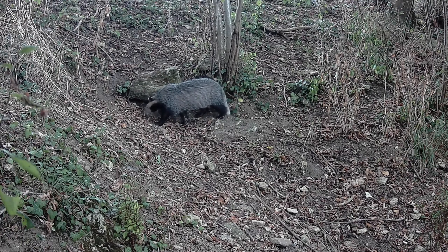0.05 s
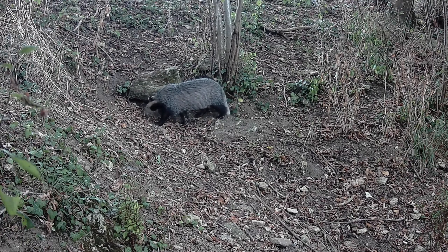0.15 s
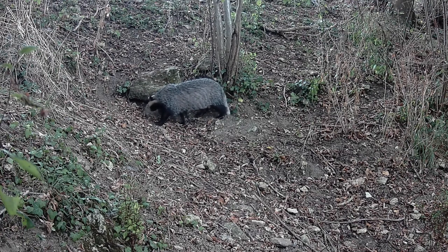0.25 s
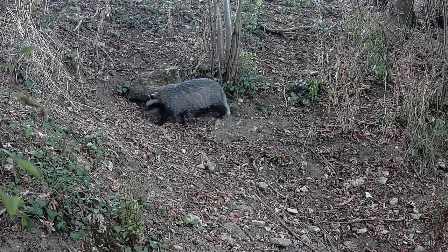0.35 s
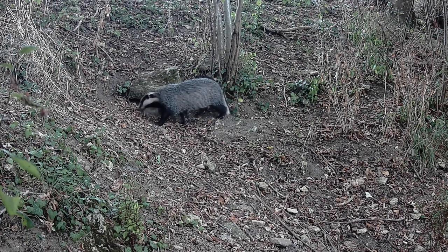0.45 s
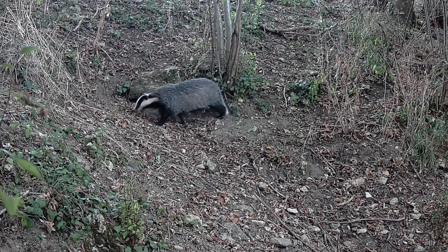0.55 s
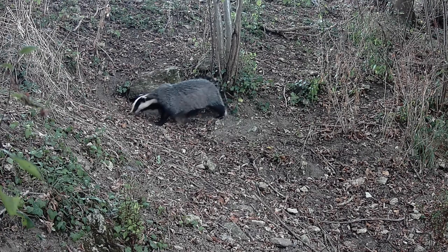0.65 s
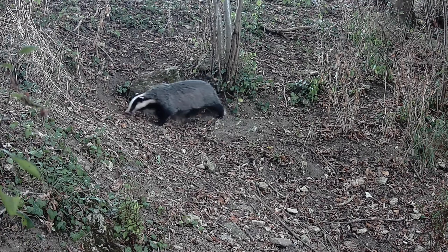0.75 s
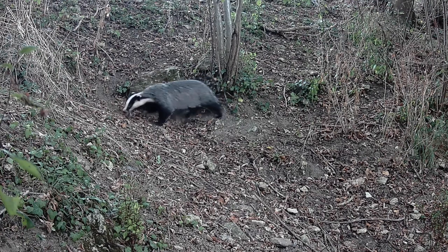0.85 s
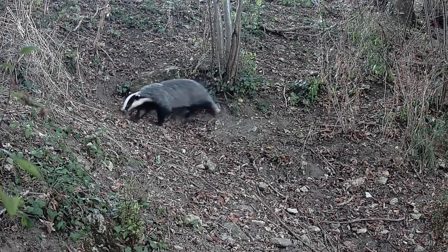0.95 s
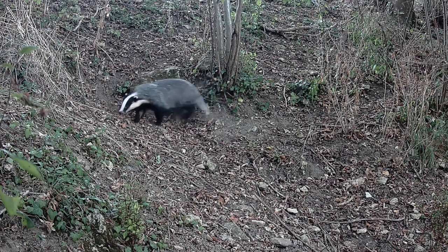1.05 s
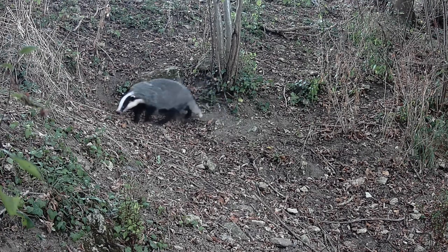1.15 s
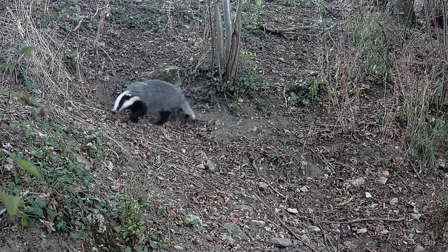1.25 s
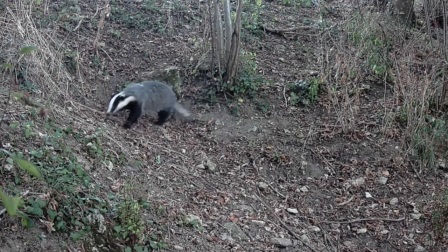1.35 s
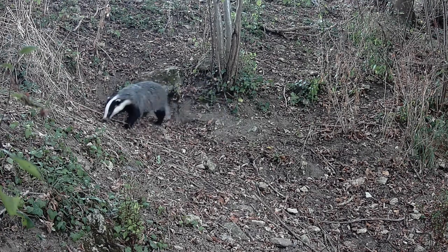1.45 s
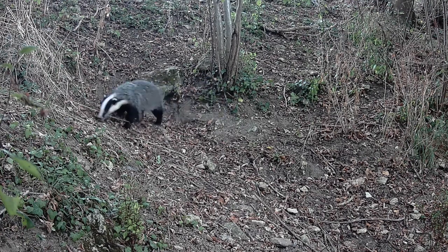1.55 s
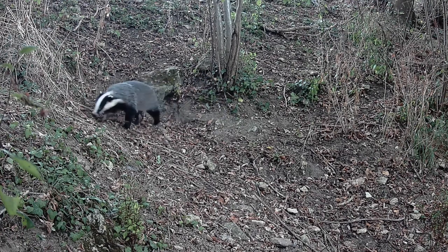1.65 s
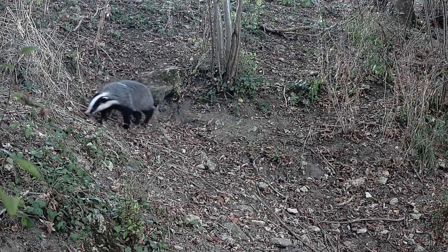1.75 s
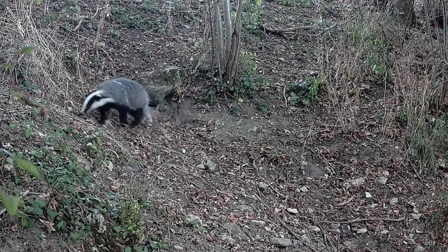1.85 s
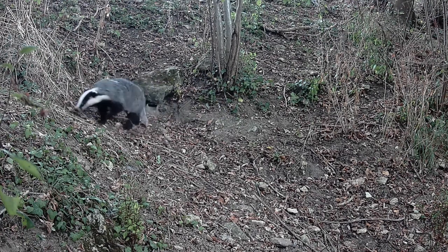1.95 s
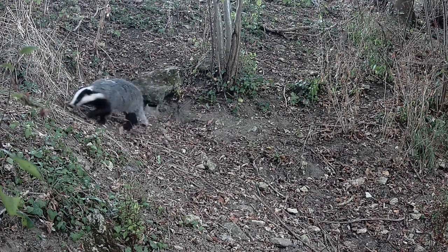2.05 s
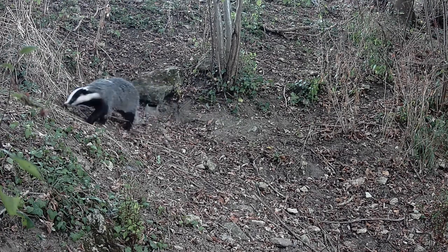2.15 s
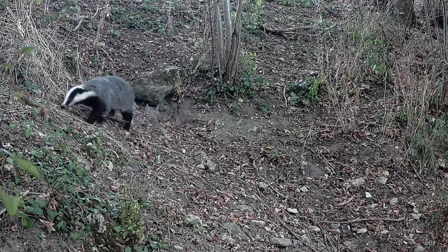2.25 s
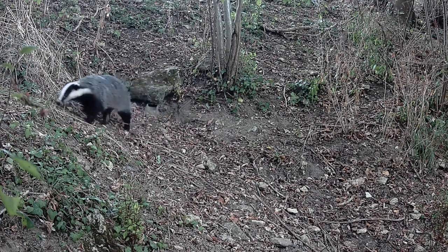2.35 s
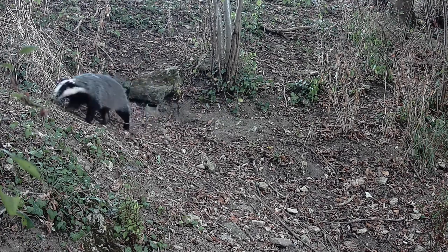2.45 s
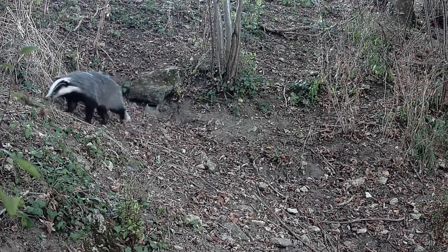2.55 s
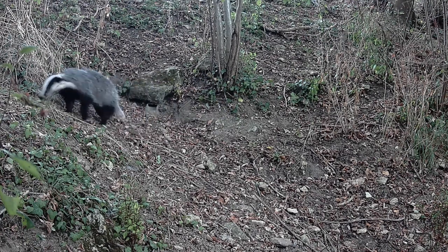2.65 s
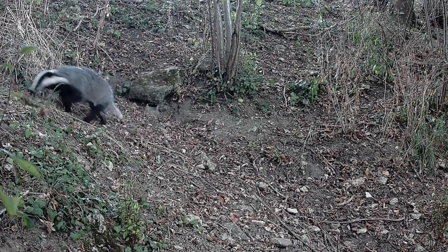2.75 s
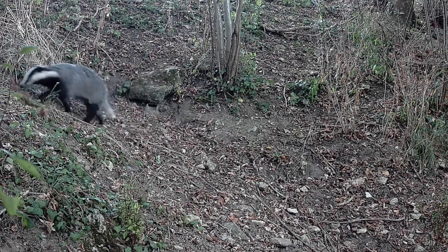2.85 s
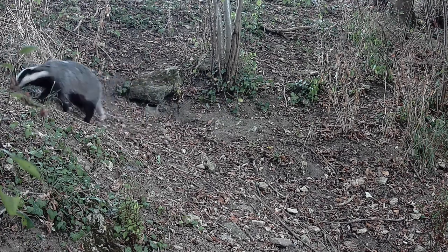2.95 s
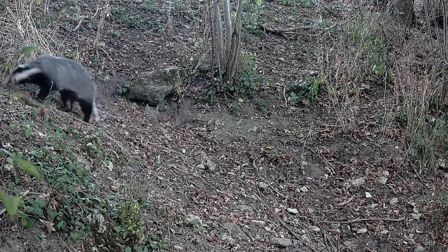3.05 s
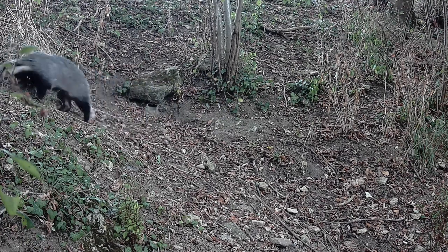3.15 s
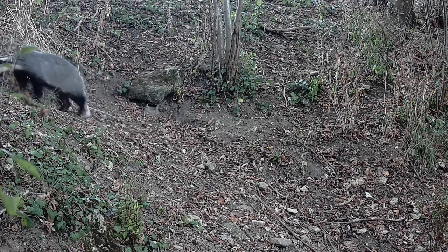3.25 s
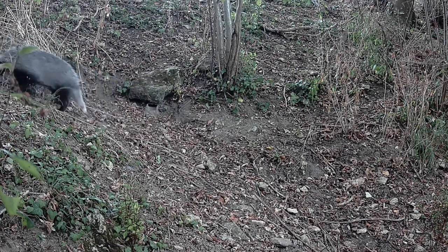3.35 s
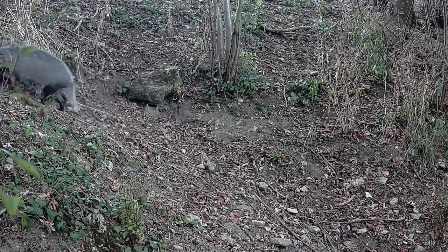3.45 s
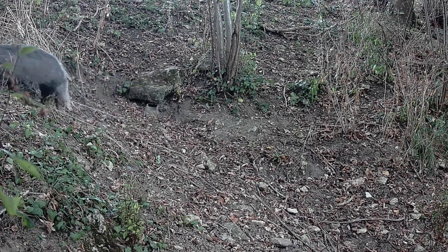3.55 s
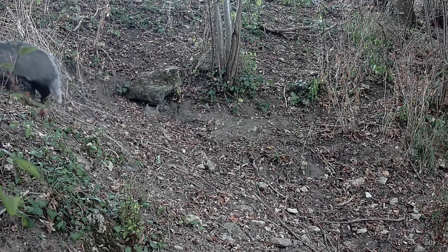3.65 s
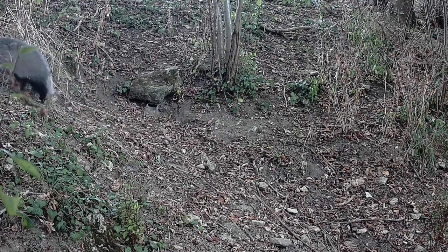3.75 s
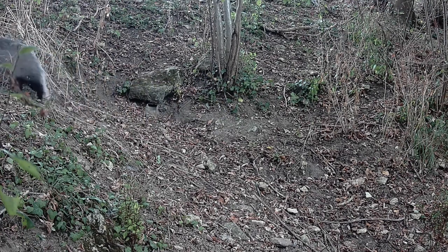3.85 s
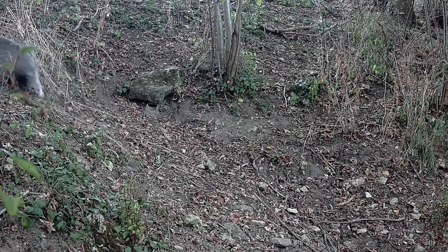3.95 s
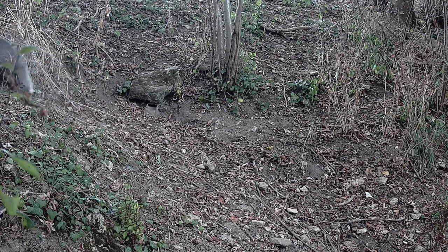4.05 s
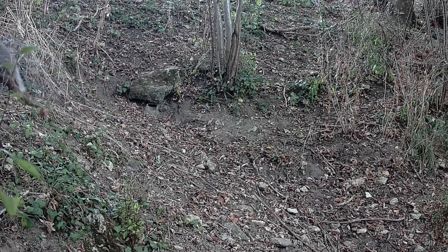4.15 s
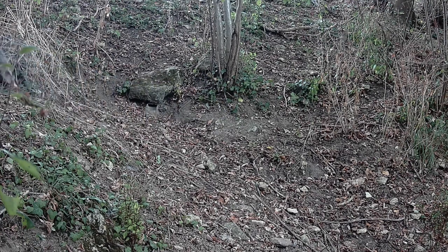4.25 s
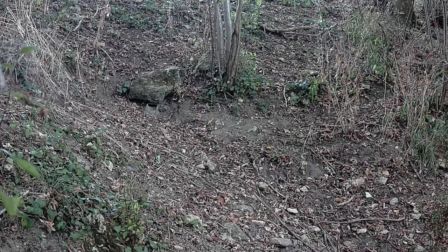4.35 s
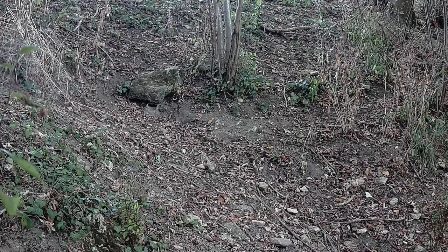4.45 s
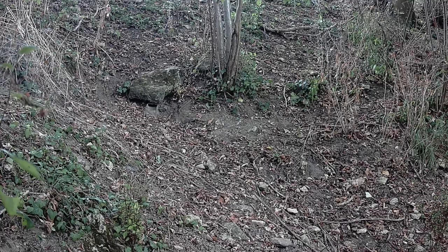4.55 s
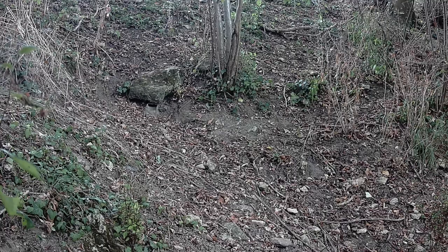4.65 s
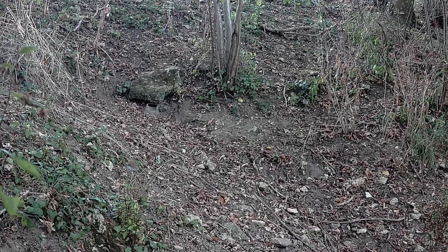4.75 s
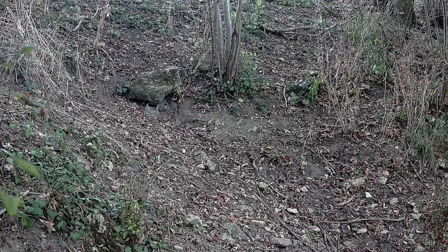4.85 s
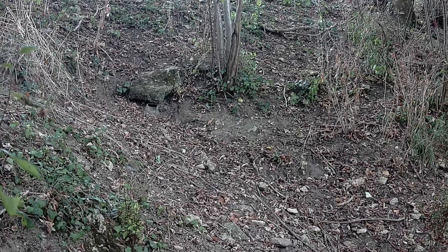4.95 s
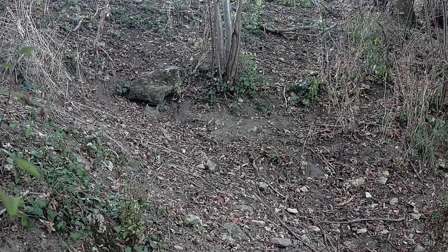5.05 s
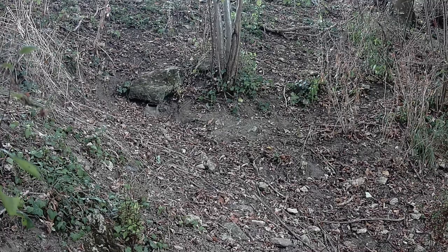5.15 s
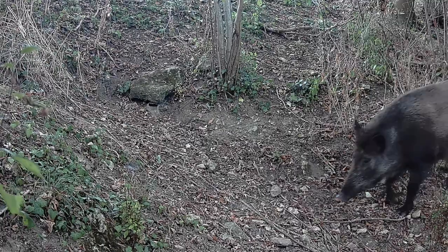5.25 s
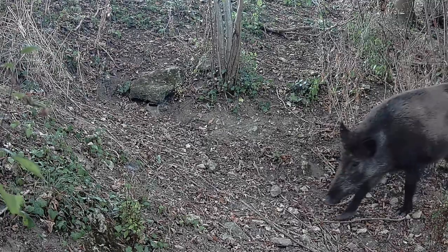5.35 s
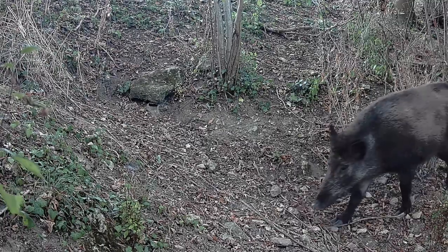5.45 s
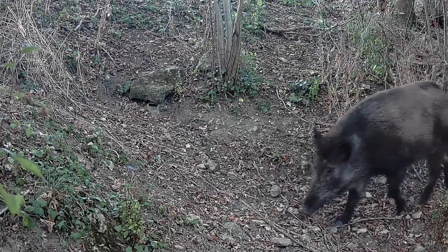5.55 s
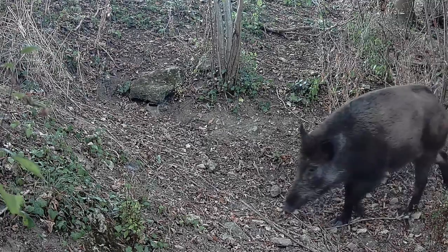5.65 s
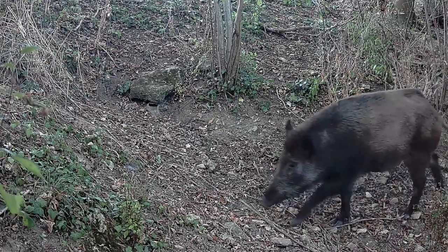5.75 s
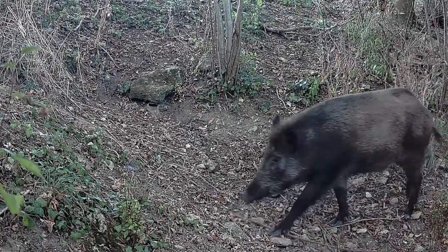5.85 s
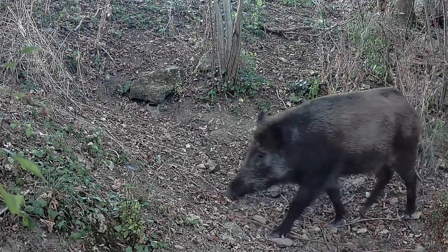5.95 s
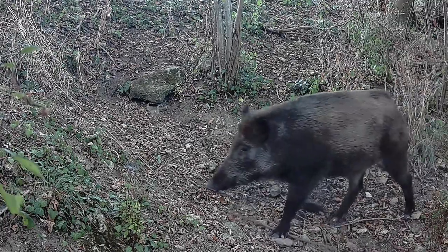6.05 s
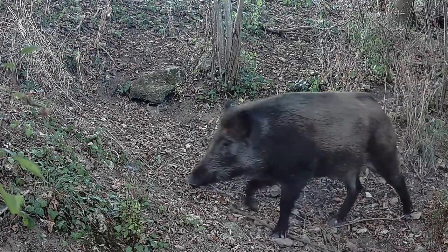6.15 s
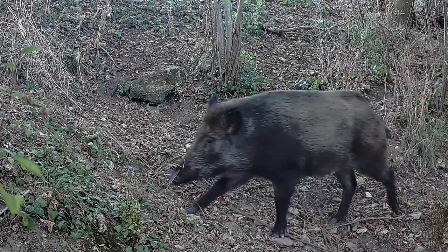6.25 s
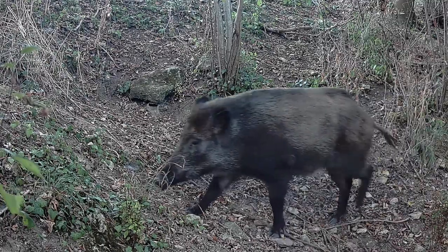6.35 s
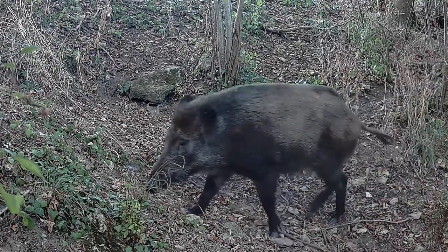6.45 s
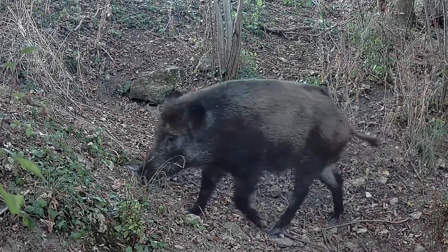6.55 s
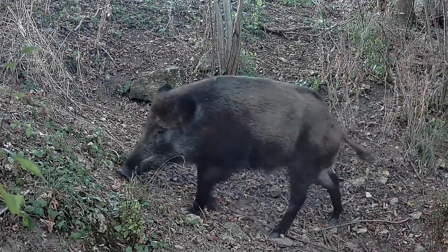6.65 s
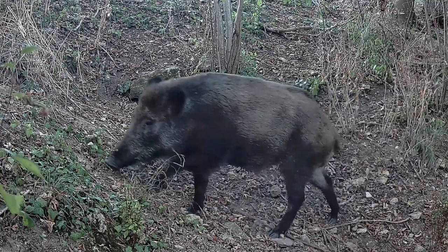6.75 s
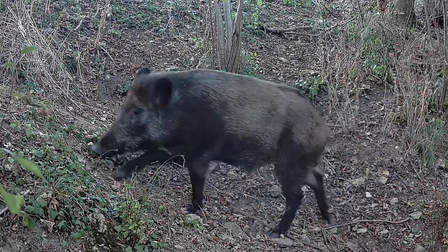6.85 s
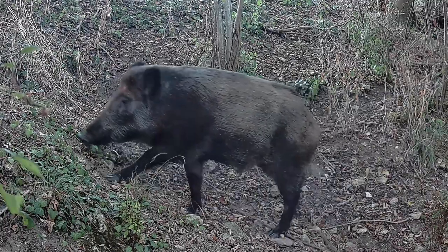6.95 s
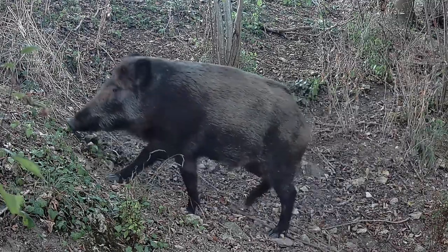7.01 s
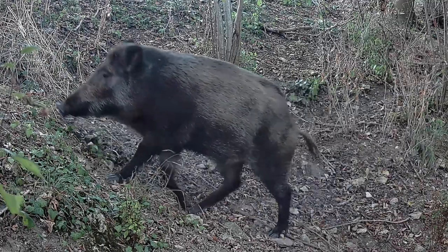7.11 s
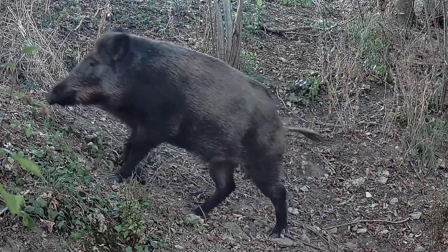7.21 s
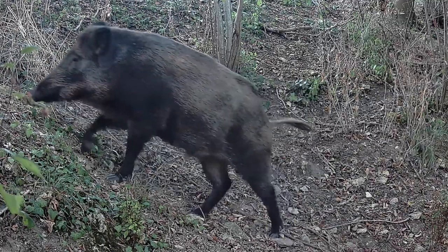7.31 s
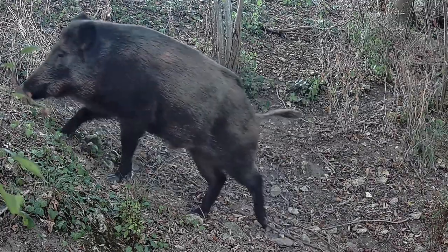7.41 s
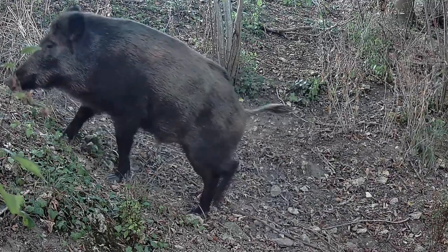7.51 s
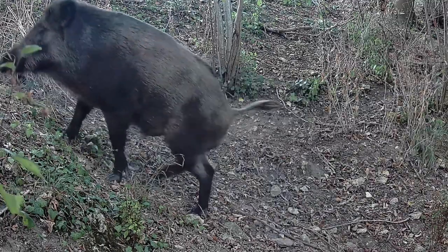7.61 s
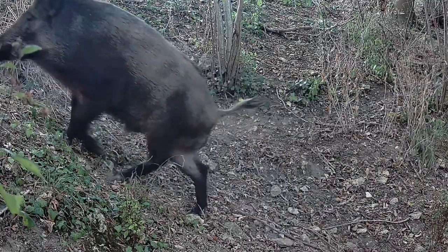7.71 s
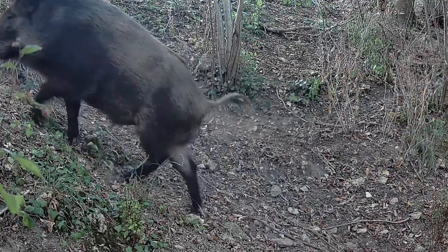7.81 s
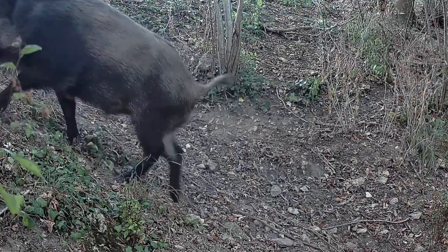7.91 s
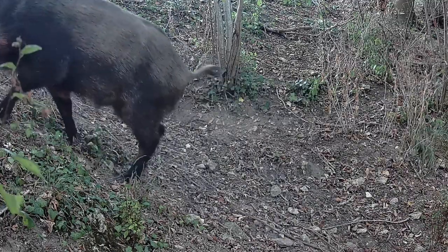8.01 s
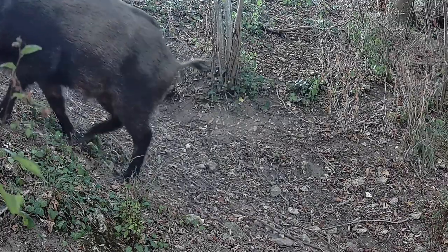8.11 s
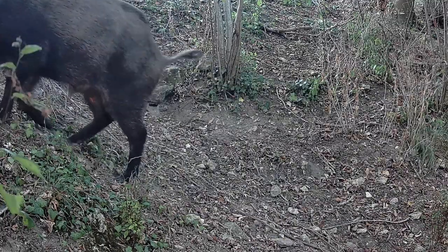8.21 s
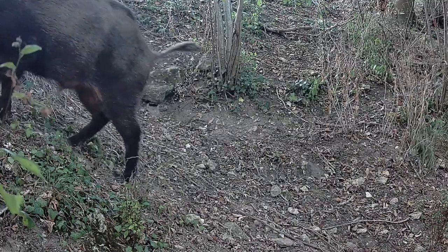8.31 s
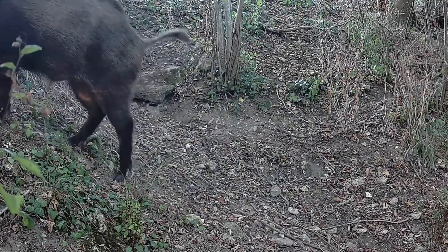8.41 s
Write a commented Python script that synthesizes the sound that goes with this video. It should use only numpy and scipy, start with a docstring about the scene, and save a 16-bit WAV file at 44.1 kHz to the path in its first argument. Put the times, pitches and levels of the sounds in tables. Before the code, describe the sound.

Light, quick badger footfalls crackle in dry leaf litter, a few metres from a fixed outdoor microphone, over dull far traffic and a slowly rising engine hum. They thin to scattered ticks. Then a heavy boar comes in abruptly, crushing leaves and cracking twigs right beside the microphone, with muffled ground thuds and short low breaths, rustling on to the end. Very little echo.

```python
"""Far traffic rumbles under two droning engine tones, then a badger pads over dry leaf litter in a wood.
It leaves, and from 5.3 s a wild boar walks close by: louder crunches, soil thuds and two huffs.
Footfalls are swells of tiny fractures ringing leaf fragments; snaps strike those fragments and ring the twig.
Thuds are lumpy noise in low earth resonances, huffs are breath noise in moving resonances.
The background is filtered noise and drifting sines; one stretch of the boar's steps is played a second time."""
import sys
import numpy as np
from scipy import signal
from scipy.fft import rfft, irfft
from scipy.io import wavfile

SR = 44100
rng = np.random.default_rng(int(sys.argv[2]) if len(sys.argv) > 2 else 0)


def put_to_file(sound):
    """Save the sound as 16-bit audio at rate SR, in the file named by the first command-line argument."""
    columns = np.atleast_2d(sound).T  # one column per channel
    safe = np.clip(columns, -1, 1)
    whole_steps = np.round(safe * 32767)
    wavfile.write(sys.argv[1], SR, whole_steps.astype(np.int16))


def ratio(d):
    """dB to gain"""
    e = np.asarray(d, float) / 20
    return 10 ** e


N = 373835

# Footfalls in the litter; depth is coarse over fine crackle:
# (peak time [s], relative level [dB], length [ms], depth [dB], pitch of the coarse crackle [Hz])
FOOTFALLS = [(0.304, -46.5, 34, 5, 2240), (0.38, -37.5, 35, -6.5, 2300), (0.545, -40.5, 32, -18, 2290),
             (0.875, -34.5, 35, -6, 2320), (0.911, -38.5, 48, -12, 1950), (1.066, -31, 12, -6, 2200),
             (1.178, -36.5, 31, -22, 1500), (1.238, -31.5, 32, -1, 1830), (1.28, -32.5, 34, -10, 2740),
             (1.446, -36, 25, -2.5, 2150), (1.482, -32.5, 24, -1, 1400), (1.588, -36, 41, -7, 1660),
             (1.694, -35.5, 4.8, -8, 1680), (1.791, -31, 17.5, -3, 1900), (1.821, -30.5, 38, -4, 1610),
             (1.876, -32.5, 38, -11, 2440), (2.015, -26, 24.5, -2, 2020), (2.049, -39.5, 33, -1.5, 1890),
             (2.25, -30, 29, -24, 2080), (2.374, -34, 17, 7.5, 2170), (2.474, -38.5, 17.7, 3.5, 1590),
             (2.534, -47, 82, -1, 1390), (2.677, -42.5, 46, -1, 2730), (2.694, -32, 9.7, 5, 1500),
             (2.941, -33, 11, -4, 1710), (2.975, -38, 29, -5, 1800), (3.022, -47, 58, 0, 1890),
             (3.112, -41, 33, 1, 2460), (3.835, -38, 17, 8, 2380), (4.012, -41.5, 18, -6, 2320),
             (4.322, -37.5, 11, -9, 1890), (4.623, -41, 10, 5, 1800), (4.713, -44.5, 15, -12, 2000),
             (4.803, -37.5, 25, 0, 2210), (4.842, -34, 36, -10, 2200), (5.337, -28, 25, 6, 1350),
             (5.38, -45, 110, -1, 1460), (5.759, -19.5, 24.3, 4, 1260), (5.803, -28.5, 36, 6, 1570),
             (5.845, -37, 36, -2, 1480), (5.944, -11, 13.4, 0, 1420), (5.99, -18, 47, 5, 1670),
             (6.047, -28.5, 110, -3.5, 2110), (6.106, -23.5, 71, 6.5, 1900), (6.145, -16, 24.6, 0, 1380),
             (6.179, -30.5, 69, 2, 1730), (6.402, -25.5, 17.5, 7, 1900), (6.465, -30, 45, -3, 1570),
             (6.489, -24, 27, 11, 1230), (6.601, -34.5, 25, 2, 1090), (6.642, -35.5, 55, 7, 1060),
             (6.748, -15.5, 35, -8, 1510), (6.775, -18, 20, 4, 1570), (6.796, -18.5, 14, -1, 1770),
             (6.826, -29.5, 43, 3, 1770), (6.923, -14.5, 11.6, 23, 1700), (7.016, -29.5, 21, 4, 1760),
             (7.054, -34, 56, -1.5, 1740), (7.091, -35.5, 6.8, -3, 1540), (7.866, -20.5, 65, 0, 1840),
             (8.046, -34, 23, 35, 1170), (8.074, -22, 14, -0.5, 1730), (8.103, -32.5, 43, 8, 1230),
             (8.196, -29, 20, 10, 1650), (8.224, -31.5, 10, 18, 1370), (8.334, -29, 34, 9.5, 1720),
             (8.375, -21, 48, 3.5, 1390), (8.407, -20.5, 16, -2, 1610), (8.433, -17.5, 38, 0.5, 2000)]
# Twigs and stiff leaves breaking; depth is coarse over fine:
# (time [s], relative level [dB], depth [dB], pitch of the coarse part [Hz])
TWIG_SNAPS = [(0.8567, -22, -7, 2070), (1.0648, -34, -2, 2030), (1.1753, -30, -20, 1700),
              (1.213, -14, 3, 1350), (1.243, -11, -14, 2100), (1.256, -13, -13, 2340),
              (1.43, -27, -3, 2200), (1.4801, -11, -4.5, 1510), (1.5635, -20, -4, 1430),
              (1.779, -19, 21, 826), (1.793, -9.5, -6, 2480), (1.8212, -15, -7, 1920),
              (2.2323, -16, -6, 2010), (2.237, -15, -16, 2160), (2.249, -5.5, 2, 1930),
              (2.6724, -15.5, -26, 2090), (2.6913, -20.5, 20, 1830), (2.9406, -15, 14, 1880),
              (3.504, -21.5, 13, 4020), (4.0145, -12, 9, 4030), (4.3197, -29.5, 14, 1780),
              (4.5083, -25.5, -5, 1710), (4.624, -26.5, 8, 1730), (4.6995, -24, -4, 2740),
              (4.802, -16, 5, 2180), (5.4715, -6, 9, 1910), (5.6278, -24, -23, 2000),
              (5.8944, -11.5, 9, 3300), (5.9342, 3.5, 4, 2130), (5.9444, 4, 6, 1510), (6.1, -3, 3, 1420),
              (6.2578, -23, -11, 1410), (6.3974, -17, 3, 2100), (6.47, -5.5, 24, 1590),
              (6.5031, -16, -3, 1440), (6.597, -23, -18, 1200), (6.735, 6, -7.5, 2460),
              (6.7503, 2, 7, 1810), (6.7915, -2, -7, 1920), (6.8627, -9, 1, 5040), (6.87, -6.5, 14, 1860),
              (6.918, 5, 32.5, 1292), (7.9607, -20, 1.5, 1897), (8.0541, -19, 15, 1680),
              (8.189, -8, 29, 1500), (8.2127, -9.5, 20, 1730), (8.383, -11, 6, 1370),
              (8.4294, -2, 13, 1760)]
# The boar's weight on the soil: (peak time [s], relative level [dB], length [ms], pitch [Hz])
SOIL_THUDS = [(5.477, -42.5, 8.3, 303), (5.766, -36.5, 44, 414), (5.947, -38.5, 14, 590),
              (6.016, -33, 26, 418), (6.135, -46.5, 120, 443), (6.477, -36, 28, 677),
              (6.751, -43, 107, 280), (6.923, -31, 13.6, 515), (7.051, -41.5, 11.4, 195),
              (7.868, -36.5, 16, 350), (8.084, -47.5, 67, 486), (8.335, -37.5, 14, 563),
              (8.377, -40.5, 19, 345), (8.424, -40.5, 36, 720)]
# The boar huffing through its snout: (start [s], length [s], level [dB], top of the arch [Hz])
SNOUT_HUFFS = [(5.483, 0.1185, -39.5, 535), (6.552, 0.15, -37.5, 437)]
# Litter settling and brushed between steps: (time [s], relative level [dB], depth, coarse over fine [dB])
LITTER_RUSTLE = [(0, -65.5, 37), (.3, -62.5, 4), (1.2, -54, 0.5), (2.3, -54, -3), (3.2, -62, 9),
                 (3.43, -51.5, 2), (4, -56, 0), (4.8, -55, -2.5), (5.27, -60.5, 4), (5.33, -50.5, -1.5),
                 (6.3, -45.5, -2), (7.1, -41, -3.5), (7.95, -47.5, -6.5), (8.48, -54, 0)]
# Colour laid over the litter sounds: (frequency [Hz], relative density [dB per Hz])
LITTER_TONE = [(400, -30), (700, -7), (900, -5), (1130, 1), (2250, 0), (2700, -5), (3400, -7.5),
               (4000, -14), (4600, -10), (5300, 0), (6900, -4), (7700, -12), (9600, -19), (11000, -34)]
# Tone of far traffic and air: (frequency [Hz], relative density [dB per Hz])
AIR_TONE = [(22, -43), (36, -3), (110, -0.5), (200, -5), (320, -9), (600, -12), (1000, -16), (2100, -31.5),
            (3700, -48), (5800, -10.5), (7200, -47.5), (11000, -67)]
# Fader for far traffic and air: (time [s], relative level [dB])
AIR_FADER = [(0, -60.5), (.4, -56.5), (3.7, -52.5), (5.3, -54.5), (8.48, -50)]
# Engine tones far off, lower and higher: (time [s], pitch [Hz], level [dB])
LOW_ENGINE = [(0, 124, -60), (.6, 122.9, -53.5), (1.8, 129.4, -54.5), (3.2, 135.2, -58), (3.9, 141.4, -79),
              (4.5, 139, -80)]
HIGH_ENGINE = [(0, 180, -55), (.8, 187, -59), (1.6, 192, -70), (2.4, 195, -60), (4.1, 203, -58),
               (5.25, 208, -58), (5.32, 208, -90)]


def litter():
    """Fractures and friction hiss excite leaf fragments of all sizes; snaps strike them all."""
    split_hz = 3455   # coarse crackle below, fine above
    s, db, length_ms, depth_db, crunch_hz = np.transpose(FOOTFALLS)
    rustle_db, rustle_depth_db = in_time(LITTER_RUSTLE)
    snap_s, snap_db, snap_depth_db, snap_hz = np.transpose(TWIG_SNAPS)
    # whole leaves breaking shake fragments of every size
    cracks = fractures(per_s=300, spread_db=3.0, clump_db=3.5)
    coarse = pieces(LITTER_TONE, 706, split_hz, count=16)
    fine = pieces(LITTER_TONE, split_hz, 10920, count=12)
    out = np.zeros(N)
    for side, band in ((1, coarse), (-1.03, fine)):
        count = len(band[0])

        def share(depth):
            """Level of this band in dB when power is split between coarse and fine."""
            return -10 * np.log10(1 + ratio(-2 * side * depth))

        press, pitch = swells(s, db + share(depth_db), length_ms, crunch_hz,
                              rise_share=0.5, rise_bend=1.9, fall_bend=1.11)
        rustle = ratio(rustle_db + share(rustle_depth_db) + 2.4 * drift(43))
        clicks = fractures(per_s=5000, spread_db=4.2, clump_db=3.5)
        dealt = rng.integers(0, count, N)   # which fragment each click goes to
        hiss = rng.standard_normal((2, N))
        chance = rng.standard_normal((len(TWIG_SNAPS), count, 2))
        for k, (hz, gain) in enumerate(zip(*band)):
            # the size of the leaf under the foot sets the pitch of the coarse crackle
            chosen = near(hz, pitch, width=.3, rest=.38) if side > 0 else 1
            struck = near(hz, np.log(snap_hz), width=.2, rest=.22 if side > 0 else .8)
            push = np.hypot(press * chosen, rustle)
            push = push * ratio(4.0 * drift(25))   # fragments come and go
            own_clicks = 0.62 * np.sqrt(count) * clicks * (dealt == k)
            drive = push * (own_clicks + 0.48 * hiss[k % 2] + 0.38 * cracks * (-1) ** k)
            # a break runs through the twig for a fraction of a millisecond,
            # each fragment struck differently
            at = np.round((snap_s + 0.00043 * chance[:, k, 0]) * SR).astype(int)
            hit = ratio(snap_db + share(snap_depth_db) + 7.0 + 2.0 * chance[:, k, 1])
            np.add.at(drive, at, struck * hit * (-1) ** k)
            out += gain * resonance(drive, hz, cycles=16.6)
    return coloured(out, LITTER_TONE)


def twigs():
    """Each broken piece rings on briefly at its own pitch, stronger the coarser the break."""
    trim_db, ring_cycles, rise_s = -9, 27, .0008   # the ring drops 60 dB in ring_cycles
    out, t = np.zeros(N + SR), np.arange(SR // 20) / SR
    for s, db, depth_db, hz in TWIG_SNAPS:
        at = round(s * SR)
        fall = ratio(db + trim_db - 60 * hz * t / ring_cycles)
        coarse_share = 1 / np.sqrt(1 + ratio(-2 * depth_db))
        onset = 1 - np.exp(-t / rise_s)
        out[at:at + len(t)] += fall * coarse_share * np.sin(2 * np.pi * hz * t) * onset
    return out[:N]


def soil():
    """Soft lumpy noise in the low resonances of compressed earth."""
    press, pitch = swells(*np.transpose(SOIL_THUDS), rise_share=0.51, rise_bend=5.6, fall_bend=2.4)
    lumps = fractures(per_s=3500, spread_db=6.0, clump_db=5.5)
    hiss = rng.standard_normal((2, N))
    out = np.zeros(N)
    for k, hz in enumerate(np.geomspace(130, 850, 10)):
        push = press * near(hz, pitch, width=0.47, rest=0.42)
        drive = push * (0.67 * lumps + 0.45 * hiss[k % 2])
        out += twice_resonant(drive, hz, cycles=5.2) * np.sqrt(hz / SR)
    dull = signal.butter(2, 950, "low", fs=SR, output="sos")
    return ratio(9.0) * signal.sosfilt(dull, out)


def huffs():
    """Breath noise in narrow resonances: a steady snout hollow and an arch rising and falling with the breath."""
    hollow_hz, arch_foot_hz, arch_db = 240, 250, 3
    out = np.zeros(N)
    for s, length, db, top_hz in SNOUT_HUFFS:
        flow = np.sin(np.linspace(0, np.pi, round(length * SR)))
        arch = np.log(arch_foot_hz + (top_hz - arch_foot_hz) * flow)
        breath = rng.standard_normal((2, SR // 4))[:, :len(flow)] * flow ** .6
        puff = np.zeros(len(flow))
        for k, hz in enumerate(np.geomspace(150, 700, 16)):
            hollow = near(hz, np.log(hollow_hz), width=0.39, rest=0.037)
            opening = hollow + ratio(arch_db) * near(hz, arch, width=0.23, rest=0)
            puff += twice_resonant(breath[k % 2] * opening, hz, cycles=11.0)
        out[round(s * SR):][:len(flow)] += ratio(db) * puff / puff.std()
    return out


def trees(x):
    """A short dull scatter from trunks and the bank: a decaying noise tail of unit energy."""
    t = np.arange(SR // 8) / SR
    tail = rng.standard_normal(len(t)) * ratio(-60 * t / 0.1) * (t > .002)
    tail = signal.lfilter([.6], [1, -.4], tail)
    return signal.fftconvolve(x, tail / np.sqrt(np.sum(tail ** 2)))[:N]


def drone(rows):
    """A far engine: a mostly rising sine that wavers on its way through the air."""
    hz, db = in_time(rows)
    phase = 2 * np.pi * np.cumsum(hz + 0.59 * drift(3.8)) / SR
    return np.sqrt(2) * ratio(db + 1.2 * drift(3.4)) * np.sin(phase)


def rumble():
    """The deep band of far traffic: noise twice through one low resonance."""
    band = twice_resonant(rng.standard_normal(N + SR), 58.3, cycles=6.0)[SR:]
    return band / band.std() * ratio(-51.5 + 1.2 * drift(.6))


def air():
    """Far traffic and air: third-octave bands of noise, each wavering a little."""
    out, edges = 0, 22 * 2 ** np.arange(0, 9.1, 1 / 3)
    white = rng.standard_normal((2, N + SR))
    for k, (low, high) in enumerate(zip(edges, edges[1:])):
        sos = signal.butter(2, [low, high], "band", fs=SR, output="sos")
        band = signal.sosfilt(sos, white[k % 2])[SR:]
        out = out + band * ratio(at_hz(AIR_TONE, np.sqrt(low * high)) + 1.9 * drift(0.65))
    return out / out.std() * ratio(in_time(AIR_FADER)[0] + 4.5)


def swells(s, db, length_ms, hz, rise_share, rise_bend, fall_bend):
    """Bursts about 9 dB down one rise before and one fall after the peak: summed size, mean log pitch."""
    power, pitch = np.full(N, 1e-18), np.zeros(N)
    step = np.arange(-SR // 5, SR // 5)
    rises, falls = rise_share * length_ms, (1 - rise_share) * length_ms
    bend = np.where(step < 0, rise_bend, fall_bend)   # the foot lands more abruptly than it lifts
    for at, level_db, rise, fall, log_hz in zip(s, db, rises, falls, np.log(hz)):
        away = np.abs(step) * 1000 / SR / np.where(step < 0, max(rise, 1), max(fall, 1))
        where = round(at * SR) + step
        inside = (where >= 0) & (where < N)
        burst = ratio(2 * level_db - 17.9 * (away ** bend)[inside])   # power
        power[where[inside]] += burst
        pitch[where[inside]] += burst * log_hz
    return np.sqrt(power), pitch / power   # the louder burst dominates the pitch


def fractures(per_s, spread_db, clump_db):
    """Random clicks of very uneven size that come in clumps; rms 1."""
    sizes = ratio(spread_db * np.minimum(rng.exponential(1, N), 5)) * rng.choice([-1, 1], N)
    clicks = sizes * (rng.random(N) < per_s * ratio(clump_db * drift(60)) / SR)
    return clicks / clicks.std()


def pieces(spectrum, low_hz, high_hz, count):
    """Pitches of the ringing fragments and their gains, total power 1 once coloured."""
    hz = np.geomspace(low_hz, high_hz, count)
    return hz, np.sqrt(hz / np.sum(hz * ratio(2 * at_hz(spectrum, hz))))


def near(hz, log_pitch, width, rest):
    """How readily a resonance at hz answers: most near the given log pitch, a rest everywhere."""
    return rest + np.exp(-((np.log(hz) - log_pitch) / width) ** 2)


def resonance(x, hz, cycles):
    """A ring that dies by 60 dB in so many cycles; white noise keeps roughly its rms."""
    r, w = ratio(-60 * hz / (cycles * SR)), 2 * np.pi * hz / SR
    ring = signal.lfilter([1, 0, -1], [1, -2 * r * np.cos(w), r * r], x + 1e-18)
    return ring * np.sqrt((1 - r * r) / 2)


def twice_resonant(x, hz, cycles):
    """The same resonance twice in a row, for steeper skirts and a softer onset."""
    return resonance(resonance(x, hz, cycles), hz, cycles)


def coloured(x, spectrum, size=2048):
    """A causal filter with the given spectrum: the cepstrum is folded onto positive times."""
    hz = np.arange(1, size // 2 + 2) * SR / size
    cepstrum = irfft(np.log(ratio(at_hz(spectrum, hz))))
    cepstrum[1:size // 2] *= 2
    cepstrum[size // 2 + 1:] = 0
    return signal.fftconvolve(x, irfft(np.exp(rfft(cepstrum))))[:N]


def drift(rate):
    """Slow chance with spread 1; rate is its corner in Hz, drawn once per 40 samples."""
    r = np.exp(-80 * np.pi * rate / SR)
    slow = signal.lfilter([1], [1, -2 * r, r * r], rng.standard_normal(N // 40 + 2002))[2000:]
    return np.interp(np.arange(N) / 40, np.arange(len(slow)), slow / slow.std())


def in_time(rows):
    """Columns of a table at every sample."""
    s, *columns = np.transpose(rows)
    return [np.interp(np.arange(N) / SR, s, c) for c in columns]


def at_hz(points, hz):
    """A spectrum in dB read on a log-frequency axis."""
    point_hz, db = np.transpose(points)
    return np.interp(np.log(hz), np.log(point_hz), db)


def scene():
    """Steps and huffs with their scatter over the far background."""
    steps = litter() + twigs() + soil() + huffs()
    background = air() + rumble() + drone(LOW_ENGINE) + drone(HIGH_ENGINE)
    return (steps + ratio(-19.5) * trees(steps) + background)[None]


def band_limit(x):
    """A steep low-pass at the top of the band."""
    return signal.sosfilt(signal.butter(12, 16840, fs=SR, output="sos"), x)


def record(dry):
    """A stretch is spliced in again with short fades; the top is cut and peaks are rounded."""
    from_s, to_s, lag = 5.30, 6.03, 80600   # the stretch returns lag samples later
    t = (np.arange(N) - lag) / SR   # time within the material being replayed
    fade = np.clip(np.minimum((t - from_s) / .03, (to_s - t) / .05) + .5, 0, 1)
    x = np.sqrt(1 - fade) * dry + np.sqrt(fade) * np.roll(dry, lag, axis=1)
    top_cut = signal.cheby2(12, 50, 11500, fs=SR, output="sos")
    x = np.tanh(signal.sosfilt(top_cut, x))
    return band_limit(x)


dry = scene()
out = record(dry)
put_to_file(out)
```